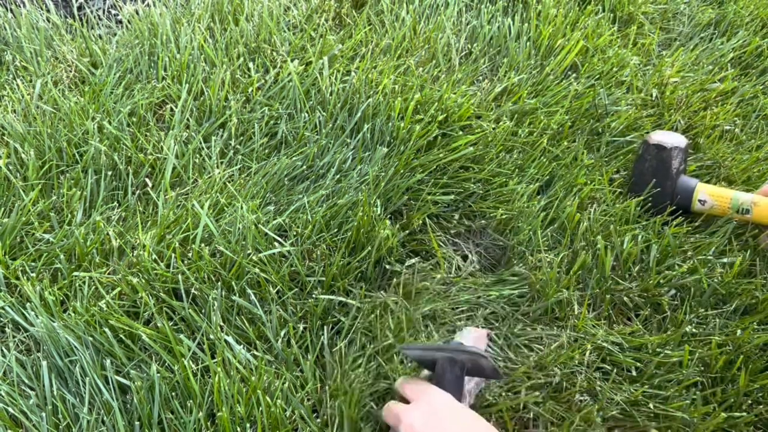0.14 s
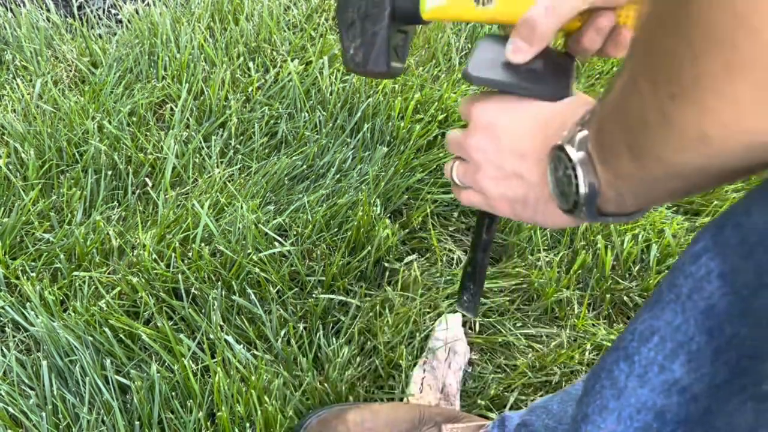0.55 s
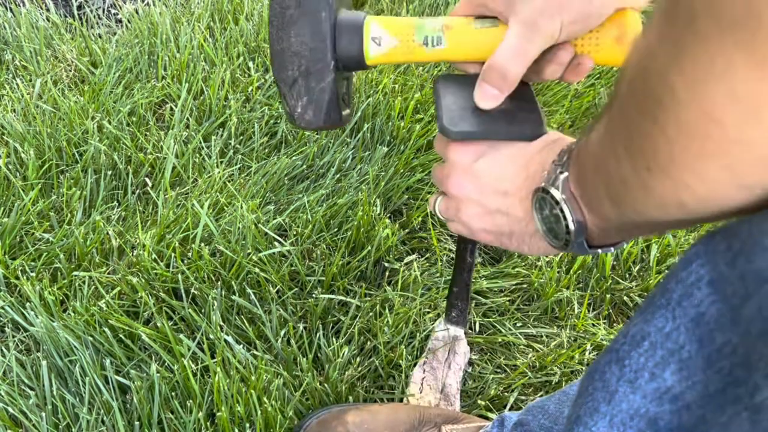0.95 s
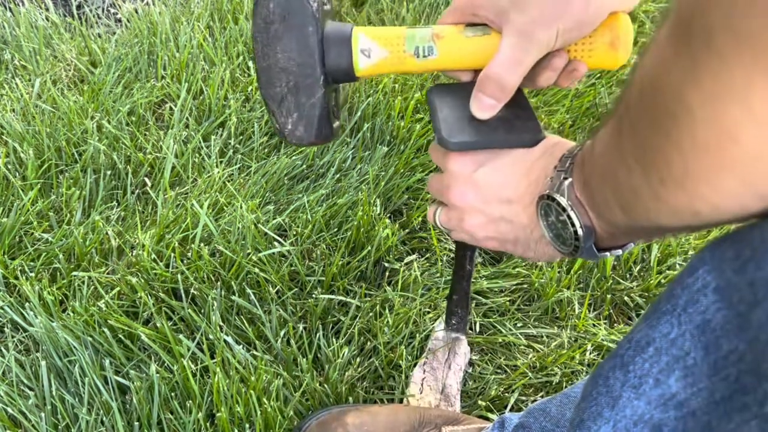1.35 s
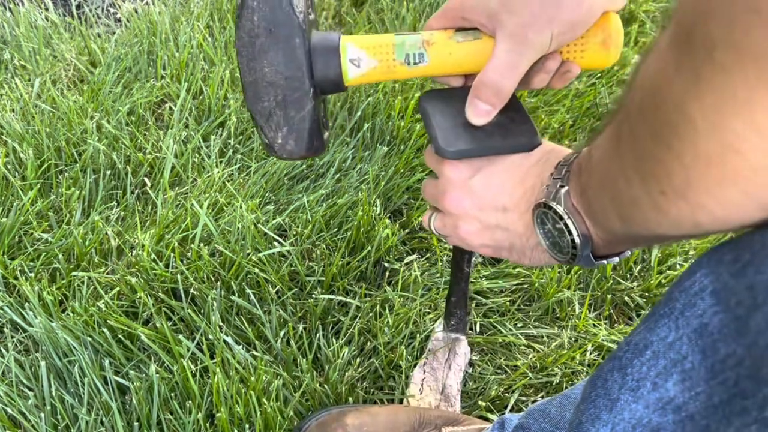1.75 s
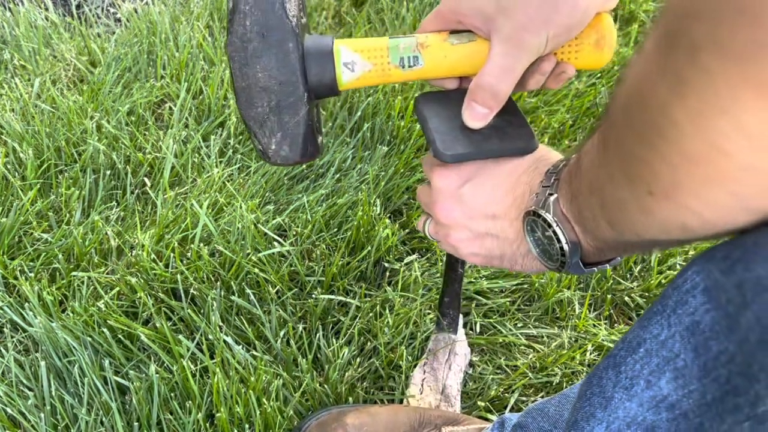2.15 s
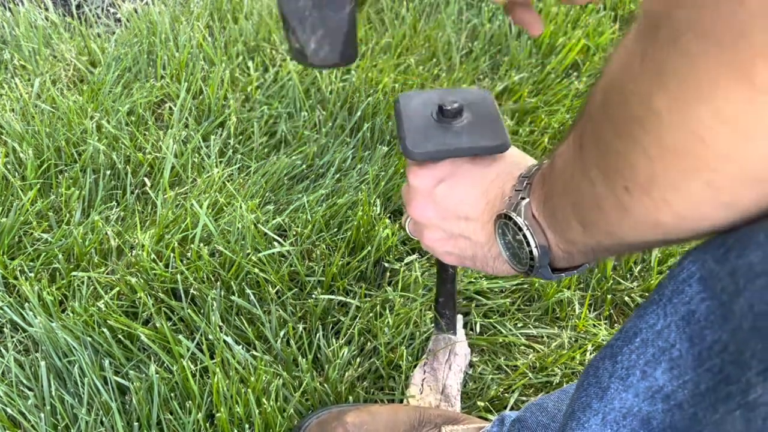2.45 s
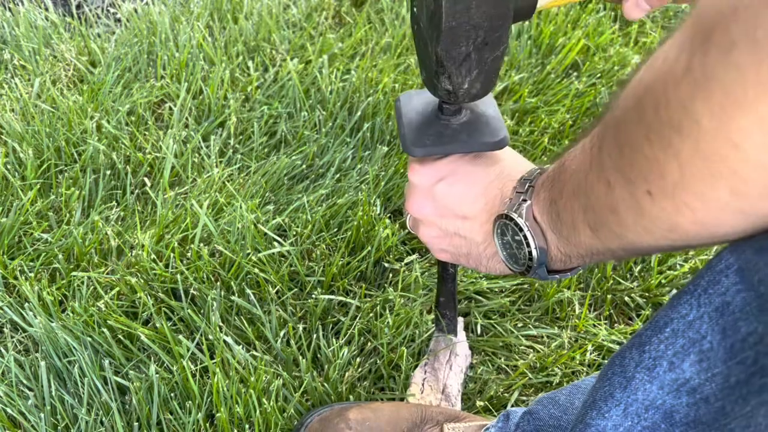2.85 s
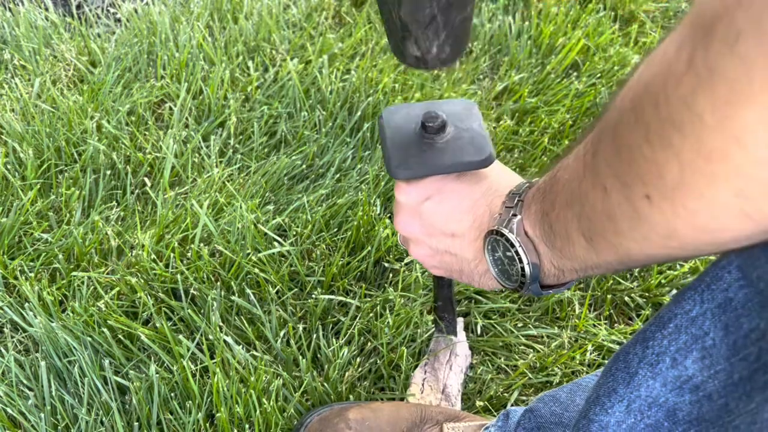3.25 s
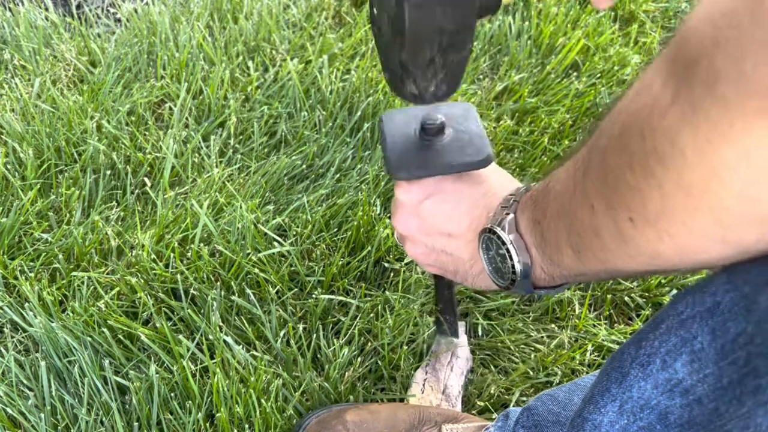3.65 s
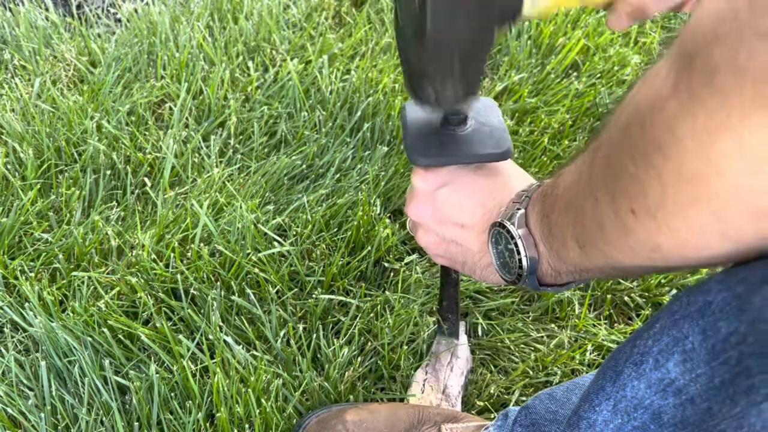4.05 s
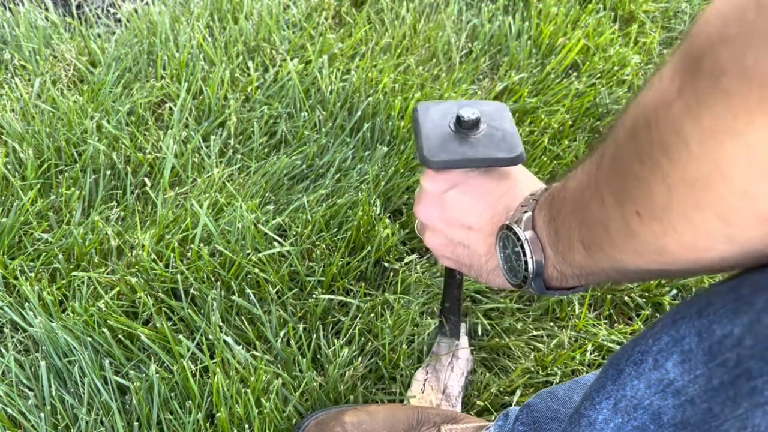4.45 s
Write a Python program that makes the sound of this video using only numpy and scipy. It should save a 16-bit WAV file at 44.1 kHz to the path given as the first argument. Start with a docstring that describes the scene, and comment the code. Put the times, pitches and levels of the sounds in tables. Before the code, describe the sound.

Faint hum and distant chirping outdoors, with a brush of grass near the microphone. A chisel edge ticks softly against stone several times, with a tiny scrape. Then four abrupt, far louder metallic hammer blows arrive, unevenly spaced over less than two seconds. Each is a bright clank damped by the gripping hand, with stone knock; the last three boom in the soil. Diffuse echoes from the open garden trail after each.

```python
"""Over a low machine hum and outdoor air, grass and clothes rustle and distant birds sing: noise and gliding sines.
From 0.8 s a hand-held steel chisel on a stone in a lawn taps lightly as it is placed or settles.
From 2.7 s a club hammer lands four blows: decaying steel modes and noise, the first three with rebounds.
The stone knocks on its bed, the last three blows boom in the soil, and the garden answers in scattered echoes."""
import sys
import numpy as np
from scipy import signal
from scipy.fft import rfft, irfft, next_fast_len
from scipy.io import wavfile

SR = 44100
rng = np.random.default_rng(int(sys.argv[2]) if len(sys.argv) > 2 else 0)


def output_pcm(signal):
    """Save a mono or channel-first signal as 16-bit PCM at the path in sys.argv[1].

    Samples are clipped to [-1, 1] before scaling.
    """
    pcm = np.clip(np.atleast_2d(signal).T, -1, 1) * 32767
    wavfile.write(sys.argv[1], SR, np.round(pcm).astype(np.int16))


N = 203204
T = np.arange(N) / SR
SIZE = next_fast_len(N, True)
FREQ = np.fft.rfftfreq(SIZE, 1 / SR)

# spectrum of crushed stone under the edge: (frequency [Hz], relative level [dB])
STONE_GRIT = [(150, -18), (400, -3), (850, -4), (1700, 5.5), (3000, -5.5), (4500, -6), (6200, -14),
              (8000, -1.5), (10500, -9), (13000, -2), (16000, -6)]
# spectrum of what the garden throws back: (frequency [Hz], relative level [dB])
GARDEN_COLOUR = [(200, -5), (1500, 0), (3300, 3.5), (4200, -5), (5500, -5), (7000, -12), (9000, -18),
                 (15000, -17)]
# light taps as the chisel is placed or settles:
# (time [s], level [dB], hardness as low-pass cutoff [Hz], ring of the steel on its seat [Hz])
LIGHT_TAPS = [(0.8383, -45.5, 1150, 502), (1.176, -50, 1070, 467), (1.2805, -52.5, 690, 463),
              (1.82, -48, 1170, 463), (2.152, -59, 3080, 1125), (2.331, -47, 4120, 1063),
              (2.652, -54, 3760, 1482), (4.484, -45, 3920, 449.6)]
# heavy blows drive the stone into the soil: (time [s], level [dB])
STONE_SINKS = [(3.543, -20), (4.02, -15.5), (4.443, -14.5)]


def undb(db):
    """Decibels to gain."""
    return 10 ** (np.asarray(db) / 20)


def curve(rows):
    """Gain over time from (time [s], level [dB]) rows."""
    return undb(np.interp(T, *np.transpose(rows)))


def fade(t, t60):
    """Exponential decay, down 60 dB at t60."""
    return np.exp(-np.log(1000) * t / t60)


def shaped(x, response):
    """Filter by a response given on FREQ."""
    return irfft(rfft(x, SIZE) * response, SIZE)[:N]


def lowpass(x, hz):
    """Two-pole low-pass."""
    return signal.sosfilt(signal.butter(2, min(hz, SR / 2 - 1), fs=SR, output="sos"), x)


def noise(points, size):
    """Noise of rms 1 with a (frequency [Hz], level [dB]) spectrum."""
    hz, db = np.transpose(points)
    n = next_fast_len(size, True)
    f = np.fft.rfftfreq(n, 1 / SR)
    colour = undb(np.interp(np.log(f + 1), np.log(hz), db))
    x = irfft(rfft(rng.standard_normal(n)) * colour, n)[:size]
    return x / x.std()


def walk(rate):
    """Smooth random wander with a spread of 1, mostly slower than the rate [Hz]."""
    x = shaped(rng.standard_normal(N), np.exp(-np.minimum(FREQ / rate, 10) ** 2))
    return x / x.std()


def add(track, s, x):
    """Mix a sound into a track at time s."""
    i = int(s * SR)
    track[..., i:i + x.shape[-1]] += x[..., :max(N - i, 0)]


def modes(rows, t):
    """Decaying sines of alternating sign from (frequency [Hz], level [dB], t60 [s]) rows."""
    out = 0
    for k, (hz, db, t60) in enumerate(rows):
        out = out + (-1) ** k * undb(db) * np.sin(2 * np.pi * hz * t) * fade(t, t60)
    return out


def echoes(x, t60, db, colour, patchy_db=2.5, bloom_s=.045, delay_s=0, grain_db=2):
    """Grainy coloured scatter that builds up, arriving unevenly, different at each ear."""
    t = np.maximum(T[:SR] - delay_s, 0)
    unevenness = undb(patchy_db * walk(70) + grain_db * walk(900))[:SR]
    envelope = fade(t, t60) * (1 - fade(t, bloom_s)) * unevenness
    tails = np.array([noise(colour, SR) for _ in range(2)]) * envelope
    tails /= np.sqrt((tails ** 2).sum(axis=1, keepdims=True))  # unit energy at each ear
    return undb(db) * signal.fftconvolve(x[None], tails, axes=1)[:, :N]


def background(wander=0.011, throb_db=2.0, wide_hz=600):
    """A motor hum of sines wavering in pitch and level, over outdoor air whose bass is alike in both ears."""
    # machine hum before its swell: (mean frequency [Hz], mean level [dB])
    hum_lines = [(59.2, -60.5), (107.7, -52.5), (119.6, -53.5), (215.4, -68)]
    # swell of the hum, followed about half as far in dB by the air: (time [s], level [dB])
    hum_swell = [(0, 3), (.9, 5), (1.2, -1), (2.0, 1.5), (2.4, 1.5), (3.5, 4.5), (3.62, -7), (4.15, -15.5),
                 (4.3, 0), (4.6, -13)]
    # spectrum of distant outdoor rumble and air: (frequency [Hz], relative level [dB])
    air_colour = [(25, -19.5), (60, -5.5), (130, -5), (200, -18.5), (320, -22), (620, -36.5), (1500, -39.5),
                  (5000, -50), (8500, -63.5), (16000, -72)]
    air_db = -54  # before the swell and the stereo width

    hum = np.zeros(N)
    for hz, db in hum_lines:
        level = undb(db + throb_db * walk(1.9)) * np.sqrt(2)
        pitch = hz * (1 + wander * walk(4))
        hum += level * np.sin(2 * np.pi * np.cumsum(pitch) / SR)
    mid = noise(air_colour, N)
    side = shaped(noise(air_colour, N), np.minimum(0.081 + FREQ / wide_hz, .9))
    air = undb(air_db + 0.32 * walk(7.4)) * np.array([mid + side, mid - side])
    swell = curve(hum_swell)
    return hum * swell * undb([[-.5], [.5]]) + air * swell ** 0.48


def note(length, start_hz, end_hz, rough):
    """One gliding bird note, a sine with a wobbling pitch."""
    u = np.linspace(0, 1, int(length * SR))
    wobble = np.interp(u * length, np.linspace(0, 1, 700), rng.standard_normal(700))  # 700 points a second
    hz = (start_hz + (end_hz - start_hz) * u) * (1 + rough * wobble)
    return np.sin(2 * np.pi * np.cumsum(hz) / SR) * np.sqrt(np.abs(np.sin(np.pi * u)))


def birds(waver=0.007, buzz=0.089, flutter_db=1.5, count=14):
    """One bird whistles clean, one chirps buzzily, one repeats a faint note; distance blurs them all."""
    # clean whistles: (time [s], length [s], start pitch [Hz], end pitch [Hz], level [dB])
    whistles = [(0.75, 0.046, 4700, 4150, -67.5), (0.964, 0.084, 4710, 4330, -66),
                (1.557, 0.11, 6580, 6470, -68.5), (1.677, 0.033, 2964, 3010, -68.5),
                (1.766, 0.056, 6470, 6160, -70), (1.879, 0.063, 3160, 3103, -67),
                (2.25, 0.055, 2438, 2410, -59.5), (2.291, 0.094, 2650, 2670, -66),
                (2.388, 0.12, 2640, 2550, -63.5), (2.573, 0.096, 2623, 2455, -60.5),
                (2.85, .04, 2950, 2820, -65), (2.895, .04, 2520, 2120, -55), (2.92, .045, 2170, 2070, -62),
                (3.081, 0.1, 2434, 2553, -59.5), (3.281, 0.086, 3138, 3038, -60),
                (3.376, 0.13, 2990, 2818, -64)]
    # buzzy chirps of a second bird: (time [s], start pitch [Hz])
    chirps = [(0.582, 5420), (0.796, 5900), (0.972, 6440), (1.073, 4490), (1.167, 4310), (1.24, 4600),
              (1.318, 4700), (1.418, 4850), (1.455, 4200), (1.576, 6100), (1.635, 4900), (1.843, 4880),
              (1.995, 5400), (2.04, 5400), (2.245, 5600)]
    chirp_s, chirp_fall, chirp_db = 0.044, .85, -68  # length; end pitch over start pitch; level
    far_span_s, far_hz, far_db = (.4, 3.5), 3595, -84  # the faint note falls at random in this span

    out = np.zeros(N)
    for s, length, start_hz, end_hz, db in whistles:
        add(out, s, undb(db) * note(length, start_hz, end_hz, waver))
    for s in rng.uniform(*far_span_s, count):
        add(out, s, undb(far_db) * note(chirp_s, far_hz, far_hz, waver))
    for s, hz in chirps:
        add(out, s, undb(chirp_db) * note(chirp_s, hz, hz * chirp_fall, buzz))
    out *= undb(flutter_db * walk(40))
    return out + echoes(out, t60=0.38, db=-6.0, colour=GARDEN_COLOUR)


def rustle(grain_db=3, flutter_db=3.0, crackle_db=-5, crackle_spread_db=5, crackles_per_s=350):
    """Each movement swells and fades; grass and cloth brush in fine uneven grains, and single blades crackle."""
    # spectrum of grass and cloth: (frequency [Hz], relative level [dB])
    rustle_colour = [(300, -4), (1500, 0.5), (4000, -3), (7500, -4), (13000, -12), (16000, -3.5)]
    # a hand or sleeve brushes the grass: (time of its height [s], rise [s], fall [s], level [dB])
    brushes = [(0.111, 0.2, 0.069, -58.5), (.47, 0.09, 0.086, -73.5), (.7, 0.042, 0.22, -66.5),
               (1.8, 0.017, 0.052, -66.5), (2.25, 0.094, 0.094, -67.5), (2.504, 0.12, 0.15, -61.5),
               (4.199, 0.035, 0.038, -72.5)]
    # a grass stalk snaps: (time [s], level [dB])
    snaps = [(2.159, -62), (2.24, -55)]
    rest_db = -84

    motion = np.full(N, undb(rest_db))
    for s, rise, fall, db in brushes:
        motion += undb(db) * np.exp(-((T - s) / np.where(T < s, rise, fall)) ** 2)
    grains = undb(grain_db * walk(500) + flutter_db * walk(13))
    flick_gain = undb(crackle_spread_db * np.minimum(rng.exponential(size=N), 4))
    flicks = (rng.random(N) < crackles_per_s / SR) * flick_gain
    crackle = undb(crackle_db) * signal.fftconvolve(flicks, fade(T[:SR // 100], 0.0033))[:N]
    envelope = motion * (grains + crackle)
    for s, db in snaps:
        add(envelope, s, undb(db) * fade(T[:SR // 20], 0.019))
    return envelope * np.array([noise(rustle_colour, N) for _ in range(2)])


def contacts():
    """Every touch of steel, in the columns of the blows: the light taps, then the blows."""
    # hammer blows and their rebounds: (time [s], level [dB], hardness as low-pass cutoff [Hz],
    # ring of the blade on its seat [Hz], seat level [dB], ring length left by the grip [0-1],
    # upper clank boost [dB])
    strikes = [(2.7505, -2.5, 5460, 1717, 0, 0.55, -2), (2.7567, -6, 3500, 1618, -0.5, 0.5, -3),
               (2.759, -8.5, 2200, 1536, 1.5, 0.7, -1), (2.829, -21, 1390, 1550, 8, 0.7, -6.5),
               (3.5302, -0.5, 8830, 1745, -7.5, 0.28, 0), (3.5378, -12.5, 5244, 1720, -7, 0.4, -1),
               (3.542, -13.5, 3670, 1405, -7, 0.5, 0), (4.009, 1, 8750, 2165, -7, 0.27, 9),
               (4.0143, -12, 5270, 1061, -8, 0.6, 8.5), (4.0168, -16.5, 3600, 1940, -7, 0.3, 7),
               (4.4381, -3.5, 10530, 2530, -4.5, 0.3, -1)]
    tap_seat_db, tap_ring = 7.5, .93
    return [(*tap, tap_seat_db, tap_ring, 0) for tap in LIGHT_TAPS] + strikes


def garden(clack, near_db=-9, mid_db=-11.0, clank_db=-28, far_db=-20, far_t60=0.8, bright_hz=3800):
    """Sharp fronts scatter off body, walls and far trees; walls repeat the clank, trees its bright ring."""
    # spectrum of what the kneeling body throws back: (frequency [Hz], relative level [dB])
    body_colour = [(300, -10.5), (1500, -2.5), (3400, -4.5), (6500, -0.5), (9500, -13.5), (13000, -13)]
    tree_ring_db = -32.5  # the steel's ring beside the sharp front

    fronts = np.zeros(N)
    for s, db, hard_hz, *_ in contacts():
        add(fronts, s, undb(db) * lowpass(signal.unit_impulse(SR // 100), hard_hz))
    body = echoes(fronts, t60=0.13, db=near_db, colour=body_colour)
    walls = echoes(fronts + undb(clank_db) * clack, t60=0.15, db=mid_db, colour=GARDEN_COLOUR,
                   patchy_db=0.5, delay_s=0.019)
    bright = signal.sosfilt(signal.butter(2, bright_hz, "high", fs=SR, output="sos"), clack)
    trees = echoes(fronts + undb(tree_ring_db) * bright, t60=far_t60, db=far_db, colour=GARDEN_COLOUR,
                   bloom_s=0.16, delay_s=0.045)
    return body + walls + trees


def debris(spray_db=-34, t60=0.14, grain_db=7):
    """Each blow that sinks the stone sprays grit into the grass: a decaying burst of grainy noise."""
    out, t = np.zeros((2, N)), T[:SR // 2]
    for s, db in STONE_SINKS:
        grains = undb(grain_db * walk(600)[:len(t)]) * fade(t, t60)
        spray = np.array([noise(STONE_GRIT, len(t)) for _ in range(2)])
        add(out, s, undb(db + spray_db) * grains * spray)
    return out


def thump(hz, sag, t60, rise_cycles=2.7):
    """A dull thump whose period lengthens by sag seconds per second, so its pitch sinks."""
    t = T[:SR // 4]
    cycles = np.log1p(sag * hz * t) / sag
    return -np.sin(2 * np.pi * cycles) * fade(t, t60) * (1 - fade(cycles, rise_cycles))


def soil():
    """The stone knocks on its bed; after a heavy blow the soil under it booms: thumps of sinking pitch."""
    # the stone rocks: (time [s], level [dB], start pitch [Hz], t60 [s], left minus right [dB])
    knocks = [(2.752, -16, 724, 0.018, -2), (2.83, -26.5, 754, 0.018, 1.5), (3.532, -25.5, 600, 0.028, -1),
              (4.01, -26, 602, 0.077, -1.5), (4.4291, -19.5, 688, 0.047, 7), (4.4396, -2.5, 1090, 0.031, 5),
              (4.488, -24.5, 543, 0.089, 2)]
    knock_sag = .55
    soil_hz, soil_sag, soil_t60_s = 81, .2, 0.11  # start pitch; sag; decay

    out = np.zeros((2, N))
    for s, db, hz, t60, pan_db in knocks:
        add(out, s, undb([[db + pan_db / 2], [db - pan_db / 2]]) * thump(hz, knock_sag, t60))
    for s, db in STONE_SINKS:
        add(out, s, undb(db) * thump(soil_hz, soil_sag, soil_t60_s))
    return out


def scrapes(catch_db=3):
    """The sliding edge catches unevenly: a rough squeak over grit."""
    # the edge slides on the stone:
    # (time [s], length [s], level [dB], squeak pitch [Hz], pitch scatter [0-1], grit level [dB])
    slides = [(1.763, 0.076, -53.5, 2950, 0.05, -1), (4.422, 0.028, -28.5, 4000, 0.12, -15.5)]
    out, slip, catch = np.zeros(N), walk(1800), undb(catch_db * walk(200))
    for s, length, db, hz, scatter, grit_db in slides:
        size = int(length * SR)
        squeak = np.sin(2 * np.pi * np.cumsum(hz * (1 + scatter * slip[:size])) / SR)
        grit = undb(grit_db) * lowpass(noise(STONE_GRIT, SR), 1600)[:size]
        add(out, s, undb(db) * (squeak + grit) * np.hanning(size))
    return out * catch


def ticks(t60=0.032, grit_db=-4, db_per_octave=14, snap_hz=3900, graze_s=0.0049, graze_db=-7,
          click_db=-8, click_t60=0.0205):
    """At each tap grit snaps as the edge grazes and again as it lands with a click; hard taps snap more."""
    # spectrum of the dry click of the edge on stone: (frequency [Hz], relative level [dB])
    click_colour = [(300, -9), (1100, 1.5), (1850, -12), (2600, -20), (12000, -34)]
    out, t = np.zeros(N), T[:SR // 40]
    for s, db, hard_hz, _ in LIGHT_TAPS:
        gain = undb(db + grit_db + db_per_octave * np.log2(hard_hz / snap_hz))
        graze, snap = rng.standard_normal((2, len(t))) * fade(t, t60)
        click = undb(db + click_db) * noise(click_colour, len(t)) * fade(t, click_t60)
        add(out, s - graze_s, gain * undb(graze_db) * graze)  # the graze leads the landing
        add(out, s, gain * snap + click)
    return out


def chisel(crack_db=-8, crack_t60=0.014, spread_db=-14, bite_s=0.0013):
    """Each contact rings steel and seat as decaying modes and crushes grit; soft contacts are dull."""
    # chisel and stone, damped by the fist:
    # (frequency [Hz], level before the clank boost [dB], t60 before the grip shortens it [s])
    steel_modes = [(313, -23, 0.049), (490, -23, 0.034), (693.8, -23, 0.046), (1208.4, -20, 0.076),
                   (1079.5, -15, 0.07), (1517, -13.5, 0.04), (1688, -11.5, 0.034), (1900, -11.5, 0.058),
                   (2088, -10, 0.048), (2440, -5.5, 0.01596), (2750, -7.5, 0.03), (3080, -7, 0.038),
                   (3477, -13.5, 0.032), (3924, -14, 0.022), (4620, -22, 0.04), (4780, -18, 0.034),
                   (7350, -19.5, 0.034), (8400, -16.5, 0.0083), (10420, -5, 0.029), (12100, -8.5, 0.01)]
    # the steel sings on faintly: (frequency [Hz], level [dB])
    afterring_modes = [(1090, -48), (1690, -52), (3070, -44), (4680, -49), (10420, -48.5)]
    afterring_t60_s = 0.17
    seat_t60_s = .024  # before the grip shortens it
    clank_hz = 4205  # centre of the upper clank, whose strength depends on where the hammer lands

    out, t = np.zeros((2, N)), T[:SR // 3]
    afterring = modes([(hz, mode_db, afterring_t60_s) for hz, mode_db in afterring_modes], t)
    for s, db, hard_hz, seat_hz, seat_db, ring, clank_db in contacts():
        rows = []
        for hz, mode_db, t60 in steel_modes:
            boost_db = clank_db * np.exp(-(2 * np.log2(hz / clank_hz)) ** 2)
            rows.append((hz, mode_db + boost_db, t60 * ring))
        steel = modes(rows, t)
        seat_envelope = fade(t, seat_t60_s * ring) * (1 - fade(t, 0.0025))
        seat = undb(seat_db) * np.sin(2 * np.pi * seat_hz * t) * seat_envelope
        both, left, right = (noise(STONE_GRIT, len(t)) * fade(t, crack_t60) for _ in range(3))
        crack = undb(crack_db) * both + undb(spread_db) * np.array([left, right])
        contact = (steel + afterring + seat + crack) * (1 - fade(t, bite_s))  # soft onset
        add(out, s, undb(db) * lowpass(contact, hard_hz))
    return out


def scene():
    """The near clack reaches the two ports out of step; everything else lies around it."""
    # how far the left port leads on the near clack: (frequency [Hz], phase [rad])
    port_phase = [(0, 1), (1500, -0.1), (3500, 1.39), (5400, 0.5), (8000, 0), (12000, -6.5), (16000, -5.5)]
    # overall level, which dips briefly near the start: (time [s], level [dB])
    level_dip = [(.14, -3), (.175, -26), (.195, -2)]
    left, right = chisel() + scrapes() + ticks()
    left_lead = np.exp(1j * np.interp(FREQ, *np.transpose(port_phase)))
    near = np.array([shaped(left, left_lead), right])
    around = soil() + debris() + garden(right) + birds() + rustle() + background()
    return (near + around) * curve(level_dip)


def record(dry, drive=1.0, top_hz=16300):
    """The microphone rounds the highest peaks; the top is cut."""
    rounded = np.tanh(drive * dry) / drive
    return signal.sosfilt(signal.ellip(8, .2, 70, top_hz, fs=SR, output="sos"), rounded)


dry = scene()
out = record(dry)
output_pcm(out)
```